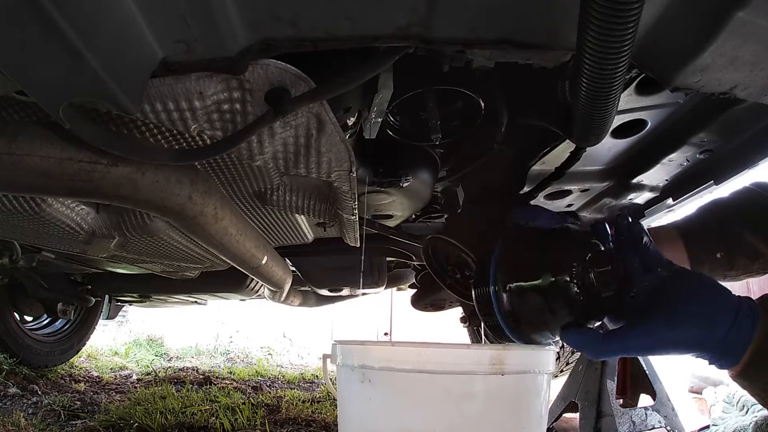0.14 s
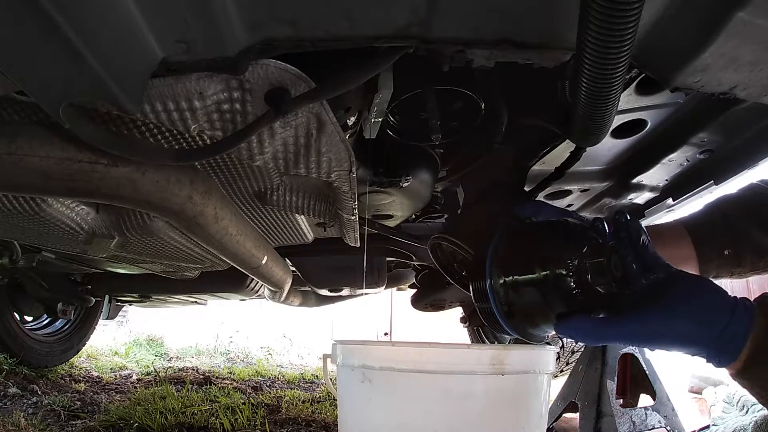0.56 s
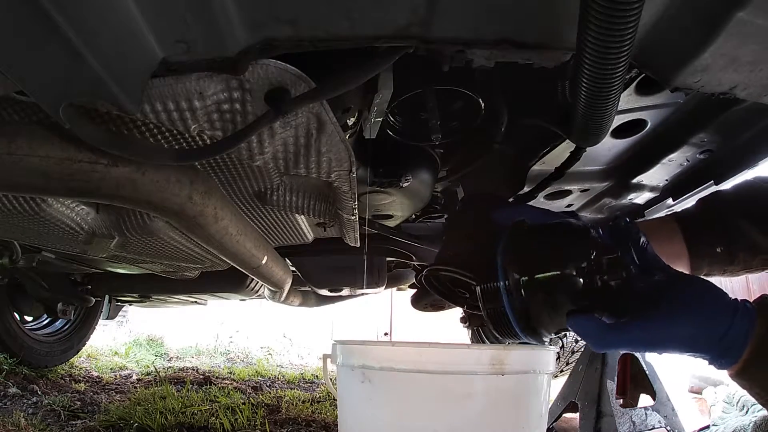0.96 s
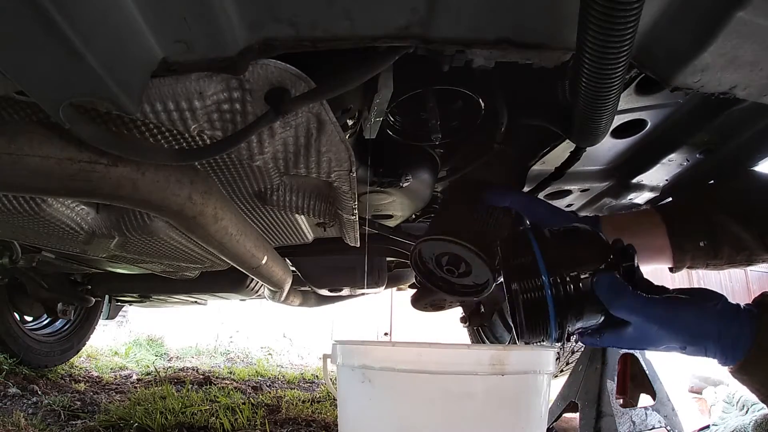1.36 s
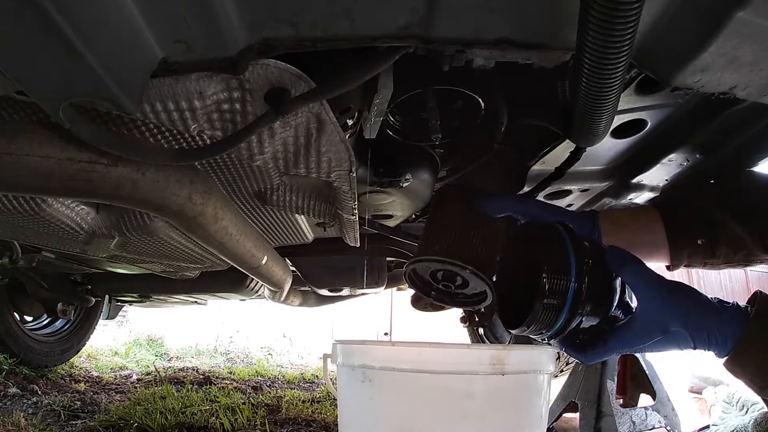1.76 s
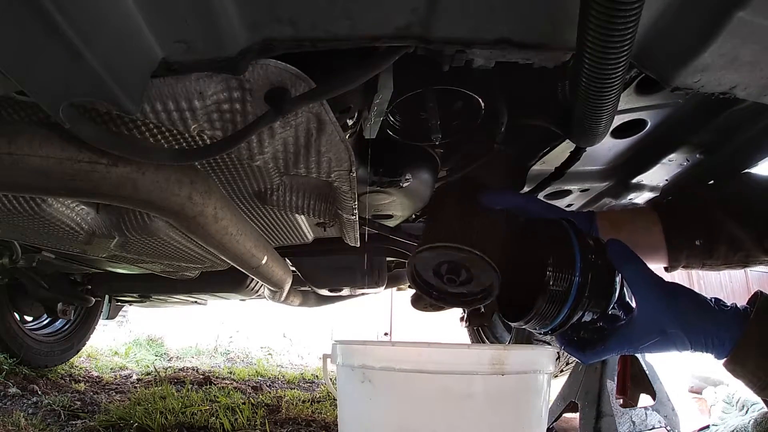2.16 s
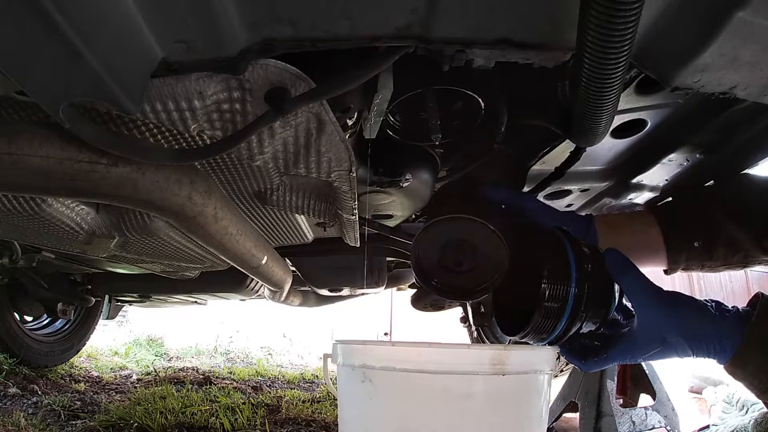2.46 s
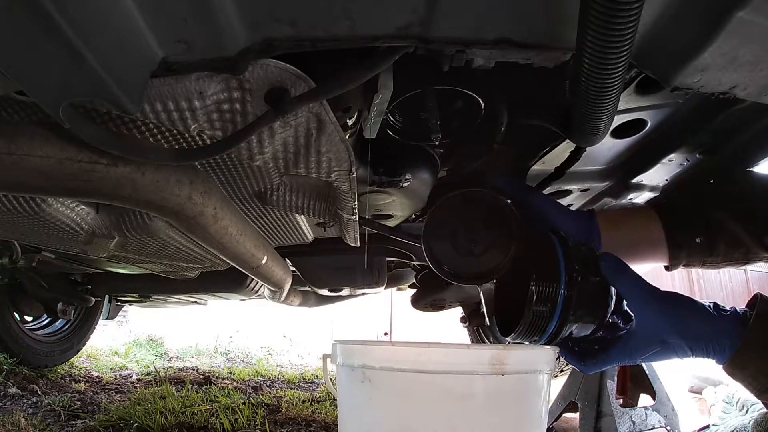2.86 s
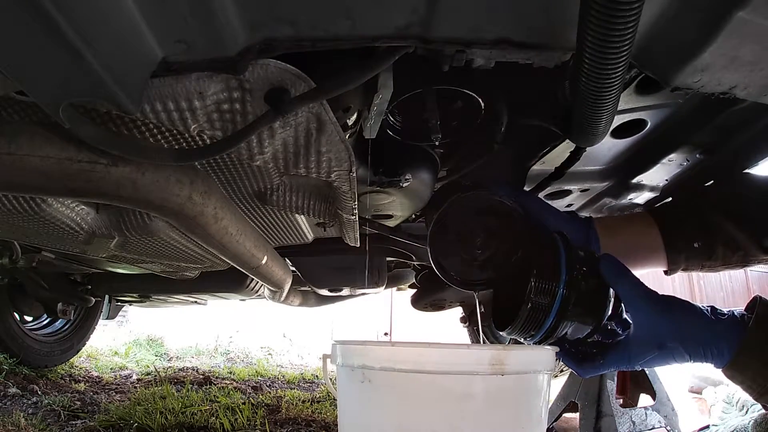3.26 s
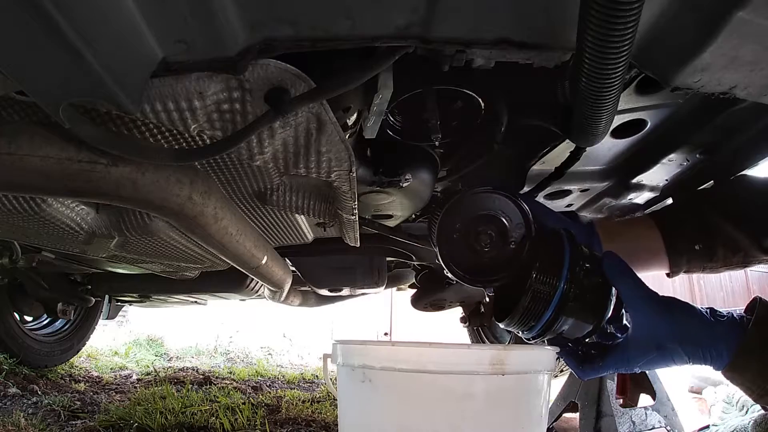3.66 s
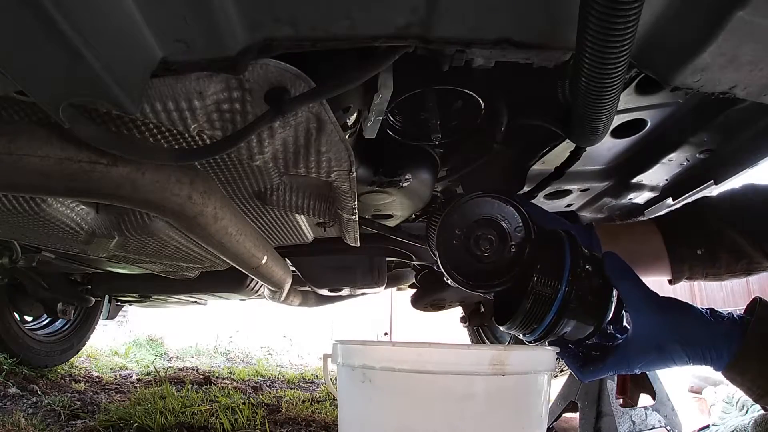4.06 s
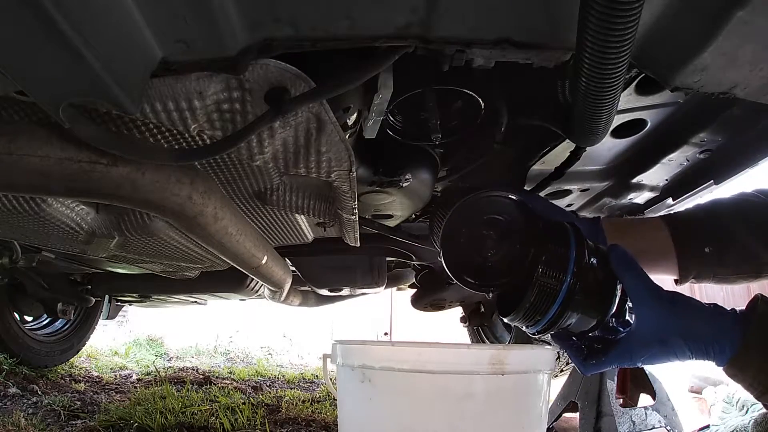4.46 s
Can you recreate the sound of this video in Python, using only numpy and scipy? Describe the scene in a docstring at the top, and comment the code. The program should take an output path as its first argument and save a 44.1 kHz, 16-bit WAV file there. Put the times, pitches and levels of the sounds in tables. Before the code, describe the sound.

Outdoors beneath a car, heard close up, a plastic housing gives short rough scrapes with low thumps in the first 0.2 seconds, while fuel drips and trickles into a plastic bucket. A very faint thin hiss-like whistle passes around 0.3 seconds. Bright plinks and small spatters continue irregularly. At 1.2 seconds comes the loudest hollow knock, with a boom from the underbody; softer knocks follow at about 1.45 and 1.63. The trickle thins near 2 seconds, then drops crowd together from 2.5, with another knock at 2.56 and faint scraping. A deep, short gulp bursts at 2.85 amid spray, and a higher bubbly bloop at 3.36. Soft low thumps occur near 3.25 and 3.9 to 4.2. Drops become sparse, with a plink at 4.2 and a light, clicky knock at 4.55. Low wind rumble and a faint distant background persist throughout.

```python
"""Under a car, a plastic fuel housing is worked loose and tipped over a plastic bucket.
Drops of fuel spatter and plink as trapped bubbles ring; a thin thread of fuel beads and fizzes.
The housing scrapes and knocks, made from random clicks and noise through its ringing pitches,
and the underbody booms at its own low pitches. Filtered noise makes a faint whistle at the seal,
the rumble of air on the microphone and a distant outdoor background."""
import sys
import numpy as np
from scipy import signal
from scipy.fft import rfft, irfft
from scipy.io import wavfile

SR = 44100
rng = np.random.default_rng(int(sys.argv[2]) if len(sys.argv) > 2 else 0)


def store_wav(level_fs):
    """Save 16-bit WAV to argv[1]."""
    pcm = np.round(np.clip(np.atleast_2d(level_fs), -1, 1) * 32767)
    wavfile.write(sys.argv[1], SR, pcm.T.astype(np.int16))


N = 203396
TIME = np.arange(N) / SR
SHORT = TIME[:SR // 2]  # half a second, for single events

# Clear drops that trap a bubble: start_s, pitch_hz (at the start), level_db
PLINK_DROPS = [(0.1, 3910, -35), (.353, 3050, -41.5), (.441, 2710, -31), (.449, 3520, -40.5),
               (.521, 1300, -42), (.605, 3080, -39), (.693, 3090, -43), (.839, 3036, -39.5),
               (0.911, 1925, -49.5), (1.031, 3150, -41.5), (1.165, 3050, -37), (1.218, 3154, -29.5),
               (1.328, 3006, -37), (1.410, 1810, -43.5), (1.693, 4590, -42), (1.913, 4570, -46.5),
               (2.057, 4440, -51.5), (2.227, 2374, -45.5), (2.533, 3130, -43), (2.604, 3170, -35),
               (2.667, 3030, -41.5), (2.794, 2490, -35.5), (2.818, 2870, -40.5), (2.862, 2620, -36),
               (3.01, 2920, -37.5), (3.016, 1840, -43.5), (3.036, 1730, -46), (3.151, 2230, -50),
               (3.217, 3020, -45), (3.390, 1890, -41.5), (3.440, 3060, -40.5), (3.493, 1775, -46),
               (3.674, 2500, -42.5), (3.79, 2027, -44.5), (4.221, 2427, -36.5)]
# Big gulps of air: start_s, pitch_hz, level_db, life_s, swell_s
AIR_GULPS = [(2.8432, 498, -25, 0.012, 0.00084), (2.8440, 732, -32.5, 0.0073, 0.00058),
             (3.363, 1206, -27.5, 0.021, 0.0042), (4.226, 663, -54.5, 0.045, .004)]
# Clear drops that only spatter: start_s, level_db, centre_hz
SPATTER_DROPS = [(.586, -43, 6000), (.867, -43.5, 6740), (1.023, -39.5, 4200), (1.337, -44.5, 5640),
                 (1.395, -43.5, 7500), (1.421, -39, 7150), (1.487, -38.5, 5900), (1.540, -41.5, 6000),
                 (2.094, -43.5, 7400), (2.257, -47, 4940), (2.309, -43.5, 6750), (2.344, -44, 5030),
                 (2.433, -41, 8450), (2.534, -40, 4800), (2.591, -34, 5270), (2.64, -42.5, 6840),
                 (2.941, -48, 8200), (3.008, -40.5, 9200), (3.125, -49.5, 4370), (3.236, -42, 8140),
                 (3.439, -42, 5800), (3.678, -47, 6500), (4.221, -49, 4360)]
# Flow of the thin thread of fuel: start_s, relative_level_db
FUEL_FLOW = [(0.0, -59), (0.19, -61.5), (0.95, -66), (1.12, -65), (1.33, -66), (1.5, -64.5), (1.64, -71.5),
             (2.09, -75.5), (2.36, -71.5), (2.46, -70), (2.76, -60), (3.07, -74), (3.38, -64.5),
             (3.57, -68), (3.89, -74), (4.16, -77), (4.38, -72), (4.61, -66.5)]
# Brief spurts of spray: start_s, length_s, level_db
SPRAY_SPURTS = [(.57, 0.04, -57), (1.10, 0.058, -53.5), (2.585, 0.067, -63), (2.84, 0.045, -49.5),
                (3.29, 0.094, -66.5)]
# Tone of the thread's fizz: frequency_hz, relative_level_db
FIZZ_TONE = [(1500, -13), (3000, 1), (4500, -5), (5800, -4), (7200, -1.5), (9000, -10.5), (10500, -13.5),
             (13000, -8.5)]
# Ring of the air in the bucket: pitch_hz, relative_level_db, t60_s (time to fall 60 dB)
BUCKET_RING = [(522, -4, 0.083), (724, 1, 0.18), (1220, -15.5, 0.033), (1950, -21, 0.033), (2970, -7, 0.03)]
# Whistle of air drawn in past the seal: start_s, level_db
SEAL_WHISTLE = [(0, -81), (.3, -67.5), (.55, -73), (.75, -76), (1, -93)]
# Housing strikes the underbody: start_s, level_db, treble_cut_hz, bass_cut_hz, boom_db
HOUSING_KNOCKS = [(1.0300, -43.5, 5000, 1100, -59), (1.2002, -15.5, 3100, 248, -16.5),
                  (1.4530, -32.5, 2300, 201, -24), (1.5630, -36, 3350, 676, -45),
                  (1.6269, -20.5, 2300, 300, -23.5), (2.0370, -49, 4000, 900, -55),
                  (2.5580, -26.5, 2760, 300, -25), (2.587, -32.5, 3000, 300, -43),
                  (3.6740, -41, 2480, 900, -47), (4.4853, -42.5, 2380, 580, -50),
                  (4.546, -27, 6300, 1360, -44)]
# Ring of the housing: pitch_hz, relative_level_db, t60_s
HOUSING_RING = [(467.6, -13, 0.1), (672, -10.5, 0.051), (852, -14.5, 0.12), (1121, -10.5, 0.039),
                (1227, -3, 0.077), (1287.5, -7, 0.076), (1444, -5, 0.061), (1534, -13.5, 0.075),
                (1818, -0.5, 0.01), (2004, -10, 0.051), (2266, -6, 0.032), (2440, -6.5, 0.049),
                (2946, -5, 0.055), (3147, -10.5, 0.036), (3500, 0, 0.02), (4060, -9.5, 0.044)]
# Tone of the dense crack of a contact: frequency_hz, relative_level_db
CRACK_TONE = [(100, -2), (400, 4), (950, -4.5), (1300, -4.5), (2000, -0.5), (3200, -9.5), (4500, -17.5),
              (7000, -11.5), (10000, -19.5), (14000, -30)]
# Housing slides over metal: start_s, length_s, level_db, shudder_db (of the panels)
SLIDE_STROKES = [(0.021, 0.071, -37, -54.5), (0.106, 0.018, -34.5, -36), (0.127, 0.026, -32, -35),
                 (1.217, 0.089, -49.5, -47.5), (2.652, 0.048, -49, -42), (2.751, 0.075, -47.5, -42.5),
                 (4.222, 0.055, -56.5, -57.5), (4.407, 0.033, -60, -59)]
# Ring of the underbody panels: pitch_hz, relative_level_db, t60_s
PANEL_RING = [(50.9, 0, 0.13), (65.8, 4, 0.22), (107.4, -3, 0.2), (146.4, 3, 0.15), (188.6, -3, 0.095),
              (238.3, -1, 0.12), (332.7, -12, 0.13), (403.5, -10, 0.044)]
# Each blow spreads through the panels, slow sway last: delay_s, relative_level_db, favoured_hz
BLOW_SPREAD = [(.004, -5.5, 157), (.009, -2, 294), (0.017, -0.5, 70)]
# Soft bumps that only sway the panels: start_s, peak_db, favoured_hz
SOFT_BUMPS = [(.002, -30.5, 60.4), (.129, -26, 75.4), (1.335, -29.5, 70), (3.241, -22, 51.4),
              (3.283, -29.5, 92.5), (3.89, -32, 78), (3.994, -32.5, 71), (4.086, -38, 79),
              (4.203, -29, 70.5)]
# Air on the microphone: start_s, relative_level_db
WIND_LEVEL = [(0.0, -44), (0.5, -53), (1.49, -43.5), (2.04, -51.5), (2.82, -44), (2.98, -49), (3.85, -45.5),
              (4.61, -49.5)]
# Gusts that buffet the microphone: start_s, length_s, level_db
WIND_GUSTS = [(.0, .04, -39), (3.18, 0.11, -35.5), (3.83, 0.063, -38)]
# Tone of the wind rumble: frequency_hz, relative_level_db
RUMBLE_TONE = [(15, -37), (25, 6), (45, 1), (80, -1), (120, -6), (200, -13.5), (300, -31.5), (500, -36)]
# Tone of the distant outdoor background: frequency_hz, relative_level_db
OUTDOOR_TONE = [(100, 1.5), (250, 0.5), (400, -8), (560, -17), (740, -10.5), (1000, -22), (1330, -12.5),
                (1620, -22.5), (2600, -50), (4000, -29.5), (9000, -33.5)]

CUTOFF_HZ = 14700
# A typical bubble; its life shortens as pitch rises, by this power
PLINK_HZ, PLINK_LIFE_S, LIFE_SLOPE = 2885, 0.0066, .45
STROKE_ATTACK_S, STROKE_RELEASE_S = 0.0054, 0.014
SPURT_ATTACK_S, SPURT_RELEASE_S = 0.005, 0.016
GUST_ATTACK_S, GUST_RELEASE_S = 0.038, 0.037
USUAL_FLOW_DB = -66


def drops():
    """Fuel drops: some trap a ringing bubble, some gulp air and some only spatter."""
    out = np.zeros(N)
    for start_s, hz, db in PLINK_DROPS:
        add(out, start_s, from_db(db) * plink(hz))
    for start_s, hz, db, life_s, swell_s in AIR_GULPS:
        gulp = bubble(hz, life_s, rise=0.034, onset_s=swell_s, hold=3.5, wobble=0.016)
        add(out, start_s, from_db(db) * gulp)
    for start_s, db, hz in SPATTER_DROPS:
        add(out, start_s, from_db(db) * spatter(hz))
    return out


def stray_drops(plink_db=-52, spatter_db=-50, spatter_hz=6400, spread_db=6.0, spread_octaves=0.37,
                follows=1.0, count=14):
    """Extra drops plink and spatter at loose intervals, louder when more fuel runs."""
    out = np.zeros(N)
    flow_db = follows * (in_time(FUEL_FLOW) - USUAL_FLOW_DB)
    # One plink and one spatter at random within each equal share of the time
    times = (np.arange(count)[:, None] + rng.random((count, 2))) / count * TIME[-1]
    chances = rng.standard_normal((count, 2)).clip(-1.7, 1.7)
    for (plink_s, spatter_s), (size, pitch) in zip(times, chances):
        plink_hz = PLINK_HZ * 2 ** (spread_octaves * pitch)
        add(out, plink_s, from_db(plink_db + spread_db * size) * plink(plink_hz))
        burst_hz = spatter_hz * 2 ** (.25 * pitch)
        add(out, spatter_s, from_db(spatter_db + spread_db * size) * spatter(burst_hz))
    return from_db(flow_db) * out


def plink(hz, impact_db=-9, impact_hz=3600):
    """A drop hits and traps a bubble; lower-pitched, bigger bubbles ring longer."""
    out = from_db(impact_db) * splat(impact_hz, t60=0.031, width=1.82)
    life_s = PLINK_LIFE_S * (PLINK_HZ / hz) ** LIFE_SLOPE
    add(out, 0, bubble(hz, life_s, rise=0.07, onset_s=0.00013, hold=1.22, wobble=0.042))
    return out


def bubble(hz, life_s, rise, onset_s, hold, wobble):
    """Trapped air rings as a fading tone, its pitch climbing as it nears the heaving surface."""
    age = np.arange(0, 4, 1 / (life_s * SR))[:len(SHORT)]  # counted in lives
    heave = np.interp(age, np.arange(13) / 3, rng.standard_normal(13))
    # rise is in octaves per life, over the first two lives; wobble is in octaves
    pitch_hz = hz * 2 ** (rise * np.minimum(age, 2) + wobble * heave)
    tone = np.sin(2 * np.pi * np.cumsum(pitch_hz) / SR)
    swell = 1 - np.exp(-age * life_s / onset_s)
    return tone * swell * np.exp(-age ** hold)  # a larger hold keeps it loud, then drops faster


def spatter(hz, climb=1.1, lag_s=.0045, second_db=-3):
    """A drop bursts, and finer spray follows just after, higher in pitch."""
    out = splat(hz / np.sqrt(climb), t60=0.019, width=1.2)
    finer = splat(hz * np.sqrt(climb), t60=0.017, width=1.18)
    add(out, lag_s, from_db(second_db) * finer)
    return out


def splat(hz, t60, width=1.35, onset_s=0.00043):
    """The impact of a drop: a short burst of noise in a band around one pitch; peak 1."""
    burst = rng.standard_normal(len(SHORT)) * fade(t60) * (1 - np.exp(-SHORT / onset_s))
    width = max(width, 1.05)
    spray_noise = cut(burst, [hz / width, hz * width], "band")
    return spray_noise / np.abs(spray_noise).max()


def froth(level_db=4.0, spread_db=2.5, low_hz=1800, high_hz=8500, cycles=10, count=800):
    """Hundreds of tiny bubbles stirred up by the thread, each dying within some tens of cycles."""
    out = np.zeros(N)
    for when, size, strength in rng.random((count, 3)):
        hz = low_hz * (high_hz / low_hz) ** size
        db = level_db + spread_db * min(-np.log(1 - strength), 3) - spread_db
        tiny = bubble(hz, cycles / hz, rise=0.0904, onset_s=0.00018, hold=0.94, wobble=0.044)
        add(out, when * TIME[-1], from_db(db) * tiny)
    return spray() * out


def thread(beads_per_s=31, bead_db=-58, bead_hz=7200, fizz_db=-2.5):
    """The thread of fuel breaks into nearly evenly spaced beads over a fine fizz."""
    beads = np.zeros(N)
    chance = rng.standard_normal((200, 3))  # for spacing, size and pitch
    times = np.cumsum(np.exp(0.22 * chance[:, 0])) / beads_per_s
    for start_s, (_, size, pitch) in zip(times, chance):
        if start_s < TIME[-1]:
            bead = splat(bead_hz * 2 ** (.15 * pitch), t60=0.0089, width=1.166)
            add(beads, start_s, from_db(bead_db + 2.3 * size) * bead)
    fizz = colour(grains(per_s=7000, spread_db=-0.5), FIZZ_TONE)
    return beads + spray() * from_db(fizz_db + 3.6 * drift(40)) * fizz


def spray():
    """Gain of the running fuel: the thread plus its spurts, added as powers."""
    spurts = swells(SPRAY_SPURTS, SPURT_ATTACK_S, SPURT_RELEASE_S)
    return np.hypot(from_db(in_time(FUEL_FLOW) + 2.0), spurts)


def in_bucket(x, ring_db=-48, wall_db=-8, wall_t60=0.08):
    """Quick reflections between the bucket's walls, and the ring of the air inside."""
    # Noise after a 2 ms gap stands for many dense reflections
    walls = rms_one(rng.standard_normal(len(SHORT)) * fade(wall_t60) * (SHORT > .002))
    walls = walls / np.sqrt(len(SHORT))  # total energy 1
    cavity = sum(from_db(db) * fade(t60) * np.cos(2 * np.pi * hz * SHORT)
                 for hz, db, t60 in BUCKET_RING)
    response = from_db(wall_db) * walls + from_db(ring_db) * cavity
    return x + signal.fftconvolve(x, response)[:N]


def seep(hz=6950, width_hz=330):
    """Air drawn in past the seal whistles thinly: noise in a narrow band."""
    band = [hz - width_hz / 2, hz + width_hz / 2]
    whistle = rms_one(cut(rng.standard_normal(N), band, "band", order=1))
    return from_db(in_time(SEAL_WHISTLE)) * whistle


def knocks(crack_db=-5, crack_t60=0.061, ring_db=-6, tail_db=-27, tail_t60=0.25, contact_s=0.00036):
    """Each blow cracks and rings the housing; a faint tail echoes between floor pan and ground."""
    out = np.zeros(N)
    for start_s, db, treble_cut_hz, bass_cut_hz, _ in HOUSING_KNOCKS:
        dying = from_db(crack_db) * fade(crack_t60) + from_db(tail_db) * fade(tail_t60)
        crack = dying * colour(rng.standard_normal(len(SHORT)), CRACK_TONE)
        blow = crack + from_db(ring_db) * ringing(HOUSING_RING, scatter_db=0.5)
        blow = blow * (1 - np.exp(-SHORT / contact_s))
        add(out, start_s, from_db(db) * cut(cut(blow, treble_cut_hz, "low"), bass_cut_hz, "high"))
    return out


def scrape(ring_db=-5, grit_db=-1.5, dull_hz=3800, thin_hz=620, light_db=-60, follows=1.84,
           sing_hz=1290, sing_db=-6, sing_width_hz=90):
    """Tiny slips ring the housing: a light rub follows the flow, and one pitch sings in firm strokes."""
    slips = grains(per_s=2500, spread_db=3.5) * from_db(3.2 * drift(70))
    ring = rms_one(signal.fftconvolve(slips, ringing(HOUSING_RING, scatter_db=0.5))[:N])
    sing_band = [sing_hz - sing_width_hz / 2, sing_hz + sing_width_hz / 2]
    sing = rms_one(cut(slips, sing_band, "band"))
    rub = from_db(ring_db) * ring + from_db(grit_db) * colour(slips, CRACK_TONE)
    rub = cut(cut(rub, dull_hz, "low"), thin_hz, "high", order=2)
    strokes = [(start_s, length_s, db) for start_s, length_s, db, _ in SLIDE_STROKES]
    firm = swells(strokes, STROKE_ATTACK_S, STROKE_RELEASE_S)
    light = from_db(light_db + follows * (in_time(FUEL_FLOW) - USUAL_FLOW_DB))
    return np.hypot(firm, light) * rub + firm * from_db(sing_db) * sing


def shudder(thin_hz=170):
    """Each stroke also shakes the panels: random clicks ring them, with the low end thinned."""
    clicks = grains(per_s=830, spread_db=1.5)
    shake = signal.fftconvolve(clicks, ringing(PANEL_RING, scatter_db=3.5))[:N]
    strokes = [(start_s, length_s, db) for start_s, length_s, _, db in SLIDE_STROKES]
    firm = swells(strokes, STROKE_ATTACK_S, STROKE_RELEASE_S)
    return firm * rms_one(cut(shake, thin_hz, "high", order=3))


def booms(swell_s=0.0029, reach_octaves=0.55):
    """Knocks and bumps push the panels, which swell and ring most near a favoured pitch."""
    out = np.zeros(N)
    pushes = [(start_s + delay_s, boom_db + db, hz)
              for start_s, *_, boom_db in HOUSING_KNOCKS for delay_s, db, hz in BLOW_SPREAD]
    for start_s, db, favoured_hz in pushes + list(SOFT_BUMPS):
        # A mode (one natural pitch) is 6 dB weaker at reach_octaves from the favoured pitch
        modes = [(hz, level - 6 * (np.log2(hz / favoured_hz) / reach_octaves) ** 2, t60)
                 for hz, level, t60 in PANEL_RING]
        boom = ringing(modes, scatter_db=2.0) * (1 - np.exp(-SHORT / swell_s))
        add(out, start_s, from_db(db) * boom / np.abs(boom).max())
    return out


def air(rumble_db=2.0, lumps_db=2.5, outdoors_db=-58):
    """Uneven low noise for wind on the microphone, over a steady distant background."""
    gusts = swells(WIND_GUSTS, GUST_ATTACK_S, GUST_RELEASE_S)
    strength = np.hypot(from_db(in_time(WIND_LEVEL) + rumble_db), gusts)
    rumble = colour(rng.standard_normal(N), RUMBLE_TONE)
    wind = strength * from_db(lumps_db * drift(14)) * rumble
    return wind + from_db(outdoors_db) * colour(rng.standard_normal(N), OUTDOOR_TONE)


def ringing(modes, scatter_db):
    """One blow on a set of natural pitches, each with a random strength and sign."""
    out = np.zeros(len(SHORT))
    for hz, db, t60 in modes:
        gain = rng.choice([-1, 1]) * from_db(db + scatter_db * rng.standard_normal())
        out += gain * fade(t60) * np.sin(2 * np.pi * hz * SHORT)
    return out


def grains(per_s, spread_db):
    """Random clicks of uneven size and random sign."""
    sizes = from_db(spread_db * np.minimum(rng.exponential(1, N), 4)) * rng.choice([-1, 1], N)
    return sizes * (rng.random(N) < per_s / SR)


def swells(rows, attack_s, release_s):
    """Gain of (start_s, length_s, level_db) gestures: each rises, holds and dies away."""
    gain = np.zeros(N)
    for start_s, length_s, db in rows:
        rising = 1 - np.exp(-np.maximum(TIME - start_s, 0) / attack_s)
        dying = np.exp(-np.maximum(TIME - start_s - length_s, 0) / release_s)
        gain += from_db(db) * rising * dying
    return gain


def drift(rate):
    """Slow random wandering, through `rate` random points a second of spread 1."""
    knots = rng.standard_normal(2000)
    return np.interp(TIME * rate, np.arange(len(knots)), knots)


def colour(x, spectrum):
    """Filter a signal by a (frequency_hz, relative_level_db) curve; rms 1."""
    hz, db = np.transpose(spectrum)
    bins = np.log(np.fft.rfftfreq(len(x), 1 / SR) + 1)  # log scale; +1 avoids log of zero
    gain = from_db(np.interp(bins, np.log(hz), db, left=-120, right=-120))
    return rms_one(irfft(rfft(x) * gain, len(x)))


def cut(x, hz, kind, order=2):
    """Butterworth filter: kind is what passes (low, high or band)."""
    edges = np.clip(hz, 10, .45 * SR)
    return signal.sosfilt(signal.butter(order, edges, kind, fs=SR, output="sos"), x)


def fade(t60):
    """A decay of 60 dB in t60 seconds."""
    return np.exp(-np.log(1000) * SHORT / t60)


def in_time(rows):
    """A (start_s, value) curve at every sample."""
    return np.interp(TIME, *np.transpose(rows))


def add(track, start_s, sound):
    """Mix a sound into the track from start_s, dropping what runs past the end."""
    at = max(round(start_s * SR), 0)
    track[at:at + len(sound)] += sound[:max(len(track) - at, 0)]


def from_db(db):
    """Decibels to gain."""
    return 10 ** (np.asarray(db) / 20)


def rms_one(x):
    """Scale to an rms (average strength) of 1."""
    return x / np.sqrt(np.mean(x ** 2) + 1e-20)


def scene():
    """Fuel in the bucket, the handled housing and the open air."""
    fuel = in_bucket(drops() + stray_drops() + froth()) + thread() + seep()
    housing = knocks() + scrape()
    underbody = booms() + shudder()
    return (fuel + housing + underbody + air())[None]


def record(dry, edge_hz=9900, top_db=-12):
    """The microphone turns down the treble above edge_hz, then cuts the very top."""
    treble = cut(dry, edge_hz, "high", order=16)
    dull = cut(dry, edge_hz, "low", order=16) + from_db(top_db) * treble
    return cut(dull, CUTOFF_HZ, "low", order=16)


dry = scene()
out = record(dry)
store_wav(out)
```